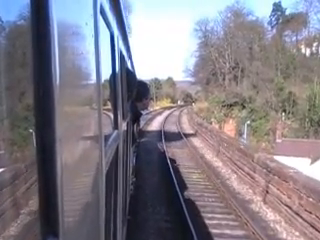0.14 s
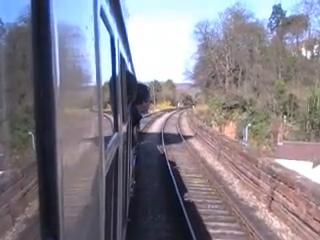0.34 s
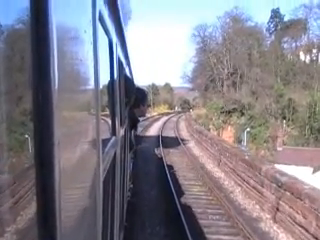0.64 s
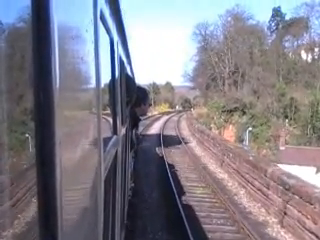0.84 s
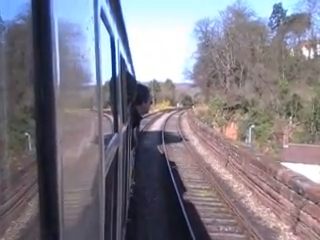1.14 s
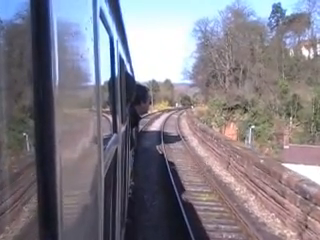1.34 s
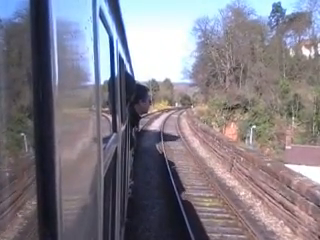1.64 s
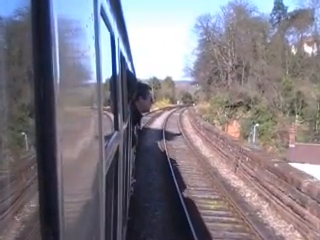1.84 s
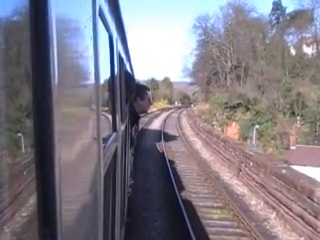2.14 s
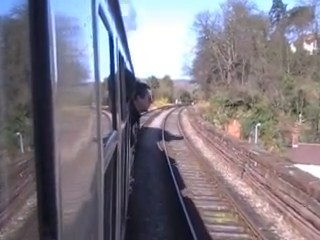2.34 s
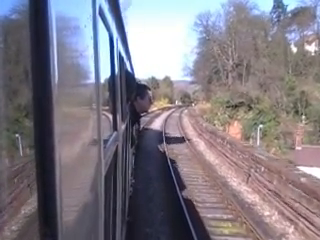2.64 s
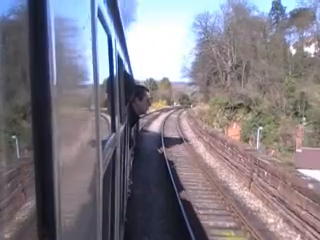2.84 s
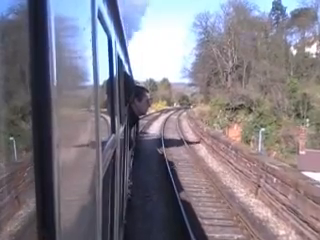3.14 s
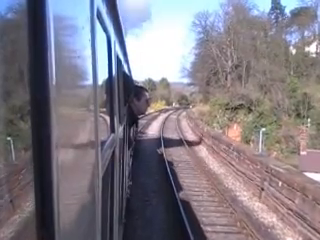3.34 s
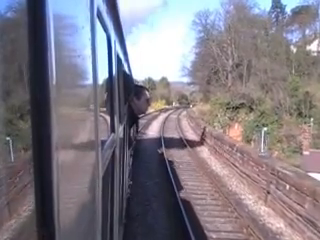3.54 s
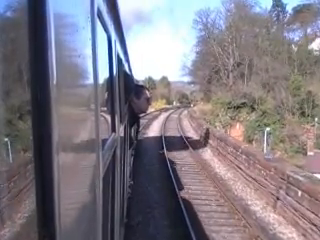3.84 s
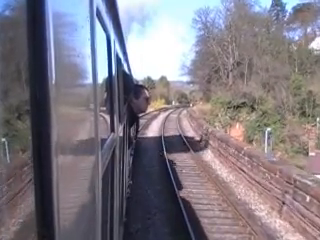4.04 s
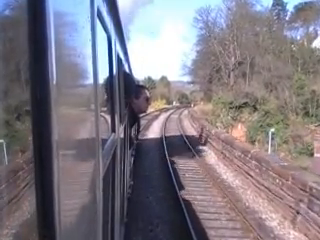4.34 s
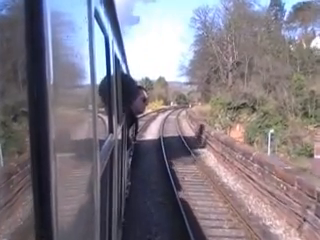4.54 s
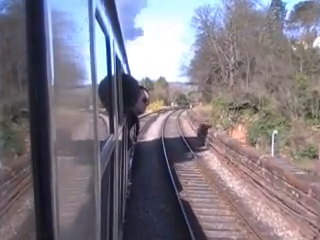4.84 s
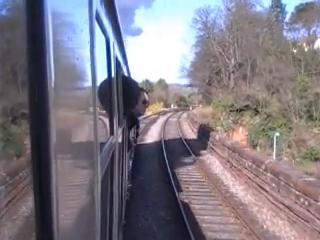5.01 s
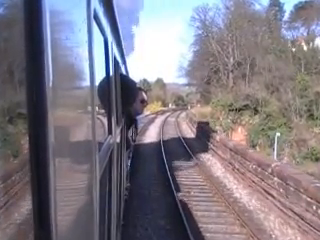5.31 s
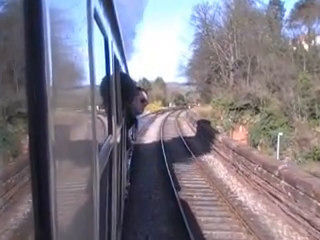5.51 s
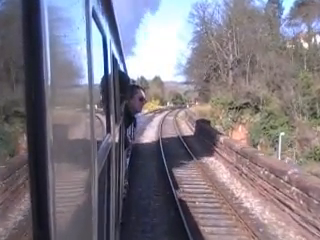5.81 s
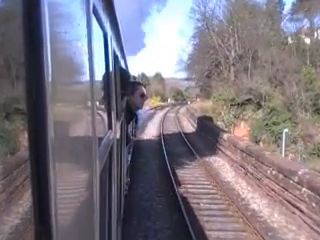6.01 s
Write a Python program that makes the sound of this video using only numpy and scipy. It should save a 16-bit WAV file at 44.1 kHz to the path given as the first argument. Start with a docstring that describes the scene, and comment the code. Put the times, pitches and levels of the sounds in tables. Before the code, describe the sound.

Heavy exhaust puffs from a working steam engine come at a nearly even pace, quickening very slightly and growing sharper and more barking. Steam hiss swells and sinks with the wheels, and carriages rumble dully underneath. Low gusts and sudden buffets hit the small stereo recorder held at the window, often harder on the left; late on comes a short rattling clunk. Treble is limited.

```python
"""Steam train pulling away

A steam locomotive pulls away slowly, heard from a carriage window some way back. Each exhaust beat is
noise that rings the chimney, with a roaring, hissing jet. Coloured noise makes the leaking steam, the
train's rumble and a coupling's jolt. Random pushes make the gusts on two microphone ports."""
import sys
import numpy as np
from scipy import signal
from scipy.fft import rfft, irfft
from scipy.io import wavfile
from scipy.ndimage import uniform_filter1d

SR = 44100
rng = np.random.default_rng(int(sys.argv[2]) if len(sys.argv) > 2 else 0)


def boost_factor(decibels):
    """Convert a level in decibels to a linear amplitude factor."""
    exponent = np.asarray(decibels, float) / 20
    return 10 ** exponent


def pcm_store(signal):
    """Save signal as 16-bit PCM."""
    levels = np.round(np.clip(np.atleast_2d(signal), -1, 1) * 32767)
    wavfile.write(sys.argv[1], SR, levels.astype(np.int16).T)


N = 272097
T = np.arange(N) / SR
HZ = np.maximum(np.fft.rfftfreq(N, 1 / SR), 1)


def rms_one(x):
    """Scale to an rms (average strength) of 1."""
    return x / np.sqrt(np.mean(x ** 2) + 1e-20)


def in_time(rows):
    """Turn a (t/s, level/dB) curve into a gain for every sample."""
    return boost_factor(np.interp(T, *np.transpose(rows)))


def at_hz(points):
    """Read a table of (f/Hz, value) at every frequency bin, on a log frequency scale."""
    hz, value = np.transpose(points)
    return np.interp(np.log(HZ), np.log(np.maximum(hz, 1)), value)


def white():
    """Two unrelated rows of plain noise."""
    return rng.standard_normal((2, N))


def noise(colour):
    """Two unrelated rows of coloured noise, rms 1: for ports(), direct and scattered sound."""
    return rms_one(irfft(rfft(white()) * boost_factor(at_hz(colour)), N))


def drift(rate_hz):
    """Smooth random wobble with spread 1: noise through a two-pole low-pass, made at SR / 40."""
    r = np.exp(-80 * np.pi * rate_hz / SR)
    draws = rng.standard_normal(N // 40 + 2002)
    slow = signal.lfilter([1], [1, -2 * r, r * r], draws)[2000:]  # skip the filter's start
    return np.interp(np.arange(N) / 40, np.arange(len(slow)), rms_one(slow))


def resonance(x, hz, width_hz):
    """A two-pole resonance that keeps the power of white noise."""
    r = np.exp(-np.pi * width_hz / SR)
    gain = np.sqrt((1 - r * r) / 2)
    return signal.lfilter([gain, 0, -gain], [1, -2 * r * np.cos(2 * np.pi * hz / SR), r * r], x)


def narrow_noise(hz, width_hz):
    """Noise twice through one resonance: a wavering tone with dark flanks, rms 1."""
    once = resonance(white(), hz, width_hz)
    return rms_one(resonance(once, hz, width_hz))


def butter(x, hz, kind, order=2):
    """Butterworth filter along time."""
    return signal.sosfilt(signal.butter(order, hz, kind, fs=SR, output="sos"), x)


# exhaust beats, four to a turn of the wheels; t is the peak of the jet:
# (t/s, boom level/dB, bark level/dB, roar level/dB, hiss level/dB)
BEATS = [(0.124, -25.5, -25.5, -24.5, -18.5), (0.571, -25.5, -18, -25, -22), (1.017, -23, -20, -27, -21.5),
         (1.501, -19.5, -21, -29.5, -24), (1.924, -24.5, -22.5, -28, -16.5),
         (2.341, -23.5, -17.5, -23, -26), (2.767, -17.5, -19, -23.5, -24.5),
         (3.222, -22.5, -20.5, -27.5, -21.5), (3.641, -26.5, -18.5, -42, -20),
         (4.023, -17, -18.5, -27.5, -18), (4.422, -20, -15, -24.5, -21.5), (4.851, -27.5, -16, -39, -17.5),
         (5.257, -20.5, -17, -28.5, -18.5), (5.631, -20.5, -15.5, -32.5, -21.5),
         (6.023, -22.5, -17.5, -28.5, -20.5)]


def puffs(column, fall_share, tail_db=-60, tail_s=0.05, lead_s=0, rise_share=1):
    """Pressure of the beats: a pointed swell that rises and falls, then a faint tail from the surroundings."""
    out = np.zeros(N)
    for row in BEATS:
        late = T - row[0] + lead_s
        # beats sharpen as the train gets under way
        base_s = 0.029 + (0.037 - 0.029) * np.exp(-row[0] / 0.79)
        width = base_s * np.where(late < 0, rise_share, fall_share)
        swell = np.exp(-0.6 * np.abs(late / width) ** 1.64)
        tail = boost_factor(tail_db) * (late > 0) * np.exp(-np.abs(late) / tail_s)
        out += boost_factor(row[column]) * np.maximum(swell, tail)
    return out


# upper resonances of the chimney: (f/Hz, width f/Hz, level/dB)
CHIMNEY = [(334.8, 20.4, 0), (499, 160, -2), (593, 39, -4), (719.7, 19, -2), (855, 41, -4), (1095, 52, -8),
           (1316, 41, -7.5), (1493, 160, -6.5)]


def chimney(churn):
    """Turbulent puffs ring the chimney and smokebox: a low boom and a bark of upper resonances."""
    early = dict(tail_s=0.071, lead_s=0.0084, rise_share=0.82)
    boom = narrow_noise(204, 30) * puffs(column=1, fall_share=1.3 * 1.266, tail_db=-27.5, **early)
    pressure = puffs(column=2, fall_share=1.16 * 1.266, tail_db=-34.5, **early) * churn
    push = white() * pressure
    beat_s = np.array(BEATS)[:, 0]
    bark = np.zeros((2, N))
    for k, (hz, width_hz, db) in enumerate(CHIMNEY):
        # each beat strikes the resonances unevenly
        uneven_db = np.interp(T, beat_s, 2.5 * rng.standard_normal(len(BEATS)))
        bark += (-1) ** k * boost_factor(db + uneven_db) * resonance(push, hz, width_hz)
    bark = bark / np.sqrt(sum(boost_factor(2 * db) for _, _, db in CHIMNEY))
    broad = rms_one(butter(white(), [200, 950], "band"))
    bark = bark + boost_factor(-9) * broad * pressure
    return boom + butter(bark, [170, 2600], "band", order=4)


# colour of the steam jet in a beat: (f/Hz, level/dB per Hz)
BLAST = [(600, -9), (1000, -2), (1600, -3.5), (2200, -10.5), (2800, -4.5), (3450, 1), (4300, -5.5),
         (5200, -11), (6300, -19.5), (7200, -32), (9000, -49.5), (12000, -81)]


def blast(churn):
    """The jet above the chimney: its lower part roars, its upper part hisses with a flicker of its own."""
    split_hz = 2230
    jet = noise(BLAST)
    shape = dict(fall_share=1.095 * 1.266, rise_share=0.93)
    roar = rms_one(butter(jet, split_hz, "low", order=4)) * puffs(column=3, **shape) * churn
    flicker = boost_factor(1.94 * drift(33.0) + 1.1 * drift(150.0))
    hiss = rms_one(butter(jet, split_hz, "high", order=4)) * puffs(column=4, **shape) * flicker
    return roar + hiss


def exhaust():
    """Each beat: the chimney speaks first, then the jet; bark and roar share one turbulent churn."""
    churn = boost_factor(1.93 * drift(40.0) + 1.17 * drift(130.0))
    return chimney(churn) + blast(churn)


def wheel_turns():
    """Turns of the driving wheels since the first beat, four beats to a turn."""
    s = np.array(BEATS)[:, 0]
    s = np.r_[2 * s[0] - s[1], s, 2 * s[-1] - s[-2]]  # one more beat at each end
    return np.interp(T, s, (np.arange(len(s)) - 1) / 4)


# leaking steam over one turn of the wheels: (share of the turn, level/dB about the slow level)
LEAK_TURN = [(0.04, -1.5), (0.24, 1.5), (0.31, -3), (0.55, -1.5), (0.64, -3), (0.8, -2), (0.93, 4)]
# colour of the leaking steam: (f/Hz, level/dB per Hz)
LEAK_COLOUR = [(500, -12.5), (1000, -4), (2200, -6), (2800, -6.5), (3500, -0.5), (4400, -9), (5400, -6),
               (6300, -3), (7500, -17.5), (9000, -27.5), (10500, -40.5), (12000, -84)]
# slow level of the leaking steam: (t/s, level/dB)
LEAK_LEVEL = [(0.0, -33), (1.05, -31), (1.3, -35.5), (1.75, -31), (2.6, -33), (3.5, -31.5), (5.4, -31.5),
              (6.17, -33.5)]


def leak():
    """Steam from glands and cocks swells and sinks with each turn; its low and high parts flicker apart."""
    turn_db = np.interp(wheel_turns(), *np.transpose(LEAK_TURN), period=1)
    steam = noise(LEAK_COLOUR) * in_time(LEAK_LEVEL) * boost_factor(turn_db)
    low = butter(steam, 1750, "low") * boost_factor(0.58 * drift(22.0) + 1.1 * drift(40.0))
    high = butter(steam, 1900, "high") * boost_factor(2.0 * drift(10.8))
    return low - high


# jolts of the coupling, level before the low cut: (start t/s, level/dB, length t/s, low cut f/Hz)
JOLTS = [(5.054, -19, 0.014, 1600), (5.08, -26, 0.041, 1200), (5.127, -16.5, 0.045, 100)]
# colour of the jolts: (f/Hz, level/dB per Hz)
JOLT_COLOUR = [(100, -25), (220, 5), (500, 2.5), (900, -6), (1400, -1.5), (2500, -9.5), (3500, -7.5),
               (5500, -25), (9000, -49)]


def jolts():
    """The coupling jolts: sudden bursts of rattling noise that die away, some thinned by a low cut."""
    rattle = noise(JOLT_COLOUR) * boost_factor(2.0 * drift(60.0))
    out = np.zeros((2, N))
    for s, db, length_s, cut_hz in JOLTS:
        rise = np.clip((T - s) / 0.009, 0, 1)
        fall = np.exp(-((T - s) / length_s) ** 2)
        out += butter(rattle, cut_hz, "high") * boost_factor(db) * rise * fall
    return out


# faint metal ticks close by: (start t/s, level/dB)
TICKS = [(0.094, -19.5), (1.648, -39), (4.567, -50)]


def ticks():
    """A few milliseconds of bright noise, unrelated in the two channels."""
    shape = sum(boost_factor(db) * (T > s) * np.exp(-np.abs(T - s) / 0.005) for s, db in TICKS)
    return rms_one(butter(white(), [6500, 10500], "band")) * shape


# lone buffets, just before the middle of each: (t/s, level/dB, left minus right level/dB)
BUFFETS = [(0.42, -11, 10), (1.282, -20, 1.0), (2.189, -22.5, 10), (2.812, -8, 14), (3.329, -15, 3),
           (3.335, -15, 15.5), (3.413, -19, 8), (3.429, -15.5, 15), (5.836, -20.5, 16)]


def buffets():
    """Single strong eddies: a short piece of a wave under a bell."""
    out = np.zeros((2, N))
    for s, db, pan_db in BUFFETS:
        cycles = (T - s) * 284 - 0.6  # 284 Hz, counted from the middle of the bell
        lump = np.cos(2 * np.pi * cycles + 0.77) * np.exp(-(cycles / 0.5) ** 2)
        out += boost_factor(db + np.array([[pan_db], [-pan_db]]) / 2) * lump
    return out


# gusts on the ports: (t/s when fully risen, hold t/s, level/dB)
GUSTS = [(0.084, 0.078, -26.5), (0.354, 0.35, -25), (0.829, 0.058, -21), (0.963, 0.14, -27),
         (1.232, 0.095, -34), (1.418, 0.069, -31), (1.718, .12, -29.5), (1.875, 0.073, -39),
         (2.079, 0.1, -27.5), (2.72, 0.067, -26.5), (3.033, 0.023, -23), (3.128, 0.36, -30),
         (3.554, 0.11, -31.5), (4.243, 0.08, -36.5), (5.482, 0.029, -40), (5.954, 0.024, -33)]


def gusts():
    """Each gust rises quickly, holds and dies away into a light breeze."""
    rise_s, fall_db_per_s, calm_db = 0.027, 152, -49.5
    out = boost_factor(calm_db)
    for s, hold_s, db in GUSTS:
        rise = np.clip((T - s) / rise_s + 1, 0, 1)
        out = out + rise * boost_factor(db - fall_db_per_s * np.maximum(T - s - hold_s, 0))
    return out


def wind():
    """Eddies strike each port on its own as uneven random pushes; deeper ones are partly shared."""
    low_hz, high_hz, lumps_per_s = 136, 493, 1300
    sizes = boost_factor(3.3 * np.minimum(rng.exponential(1, (2, N)), 3)) * rng.choice([-1, 1], (2, N))
    eddies = sizes * (rng.random((2, N)) < lumps_per_s / SR) + 1e-18
    lumps = butter(eddies, [low_hz, high_hz], "band", order=1)
    lumps = butter(lumps, 1.95 * high_hz, "low")
    # larger eddies push both ports slowly
    deep = boost_factor(-19) * rms_one(butter(eddies + 0.51 * eddies[::-1], [40, 130], "band"))
    flutter = boost_factor([4.34 * drift(11.3), 2.5 * drift(8.8)])
    return (rms_one(lumps) + deep) * gusts() * flutter


# slow level of the train's rumble: (t/s, level/dB)
RUMBLE_LEVEL = [(0.0, -32), (0.53, -34.5), (0.7, -36.5), (1.5, -39.5), (1.68, -32.5), (3.9, -32),
                (4.66, -31.5), (5.53, -32.5), (6.17, -33.5)]
# colour of the rumble: (f/Hz, level/dB per Hz)
RUMBLE_COLOUR = [(40, -23), (100, -11.5), (160, -4.5), (205, 2.5), (260, -4.5), (400, -5), (700, -7.5),
                 (1200, -21), (2500, -49.5)]


def rumble():
    """Wheels and frames drone; a narrow, faint tone comes and goes in it."""
    drone = noise(RUMBLE_COLOUR) * in_time(RUMBLE_LEVEL) * boost_factor(1.95 * drift(7.5))
    return drone + boost_factor(-46.5) * narrow_noise(614, 9)


# how far the left port leads: (f/Hz, phase/radians)
PORT_PHASE = [(60, .5), (850, .6), (1050, .1), (2500, .12), (3500, .55), (4200, 1.05), (4800, 2.0),
              (5350, 3.0), (8800, 3.1), (9400, 5.5)]
# balance of the ports: (f/Hz, left minus right level/dB)
PORT_BALANCE = [(60, 0), (110, -0.5), (190, -2), (340, -3), (610, 1), (1090, 1.0), (1950, 0.5), (3490, -3),
                (6240, 2), (11200, 13.5)]
# scattered sound, opposite in the two ports: (f/Hz, level/dB)
DIFFUSE = [(100, -12), (600, -21), (1500, -22.5), (3500, -9), (4600, -5), (5500, -26), (6500, -8.5),
           (9000, -1)]


def ports(sound):
    """Two close ports: a phase and level difference by frequency, plus scattered sound unlike in each."""
    direct, scattered = rfft(sound)
    side = np.array([[1], [-1]])
    both = direct + side * boost_factor(at_hz(DIFFUSE)) * scattered
    lead = np.exp(0.5j * side * at_hz(PORT_PHASE))
    balance = boost_factor(side * at_hz(PORT_BALANCE) / 2)
    return irfft(both * lead * balance, N)


def scene():
    """Distant sources reach both ports; wind and close ticks act on each alone."""
    distant = ports(exhaust() + leak() + rumble() + jolts())
    return distant + wind() + buffets() + ticks()


def treble_duck(x):
    """The top treble sinks while the whole sound is loud."""
    knee_db, slope = -25, 2.5  # slope: dB of sinking for each dB above the knee
    power = uniform_filter1d(np.mean(x ** 2, axis=0), size=2200)  # 50 ms average
    level_db = 10 * np.log10(power + 1e-12)
    top = irfft(rfft(x) / (1 + (7300 / HZ) ** 24), N)  # the part above 7300 Hz
    return x - top * (1 - boost_factor(-slope * np.maximum(level_db - knee_db, 0)))


def roll_off(x):
    """The treble ends steeply here."""
    return signal.sosfilt(signal.butter(12, 11750, fs=SR, output="sos"), x)


def record(dry):
    """Bass cut against wind, treble ducking and a hard ceiling."""
    bass_cut = butter(dry, 86, "high")
    held = np.clip(treble_duck(bass_cut), -1, 1)
    return roll_off(held)


dry = scene()
out = record(dry)
pcm_store(out)
```